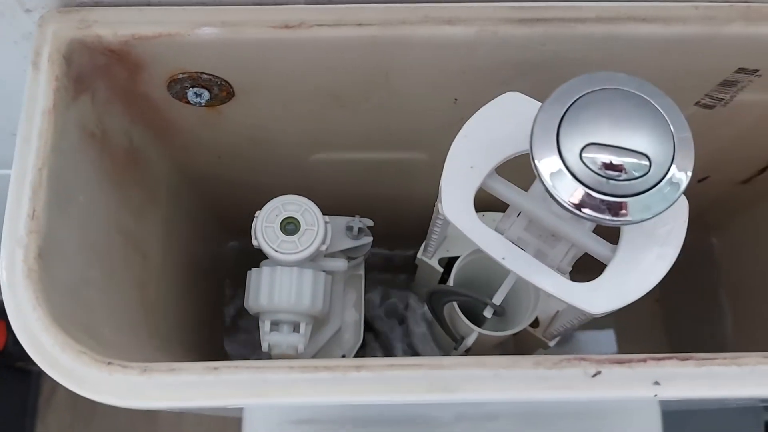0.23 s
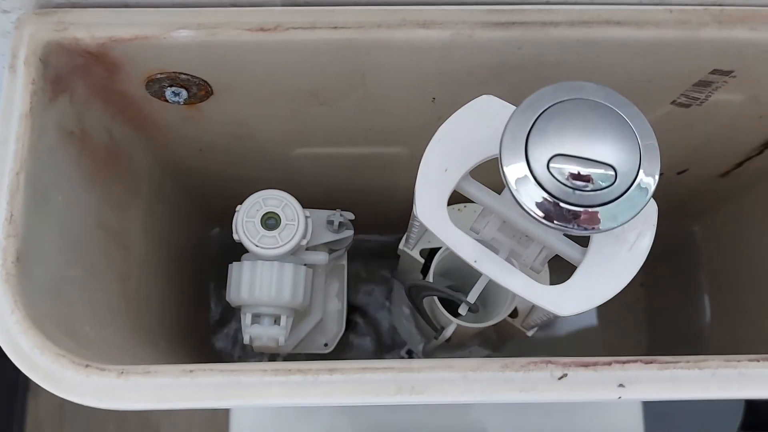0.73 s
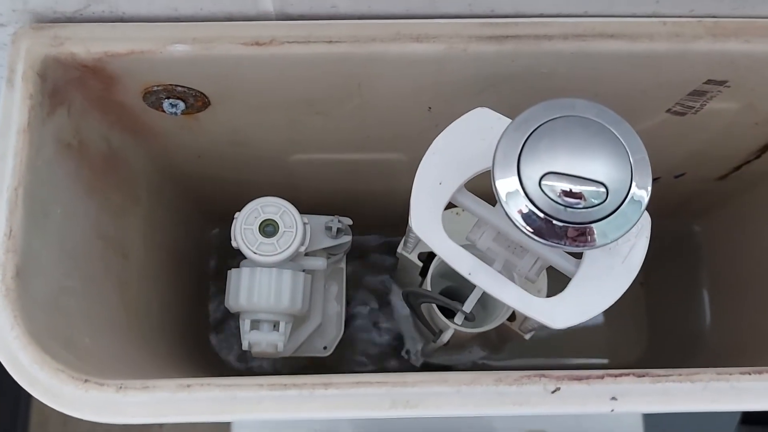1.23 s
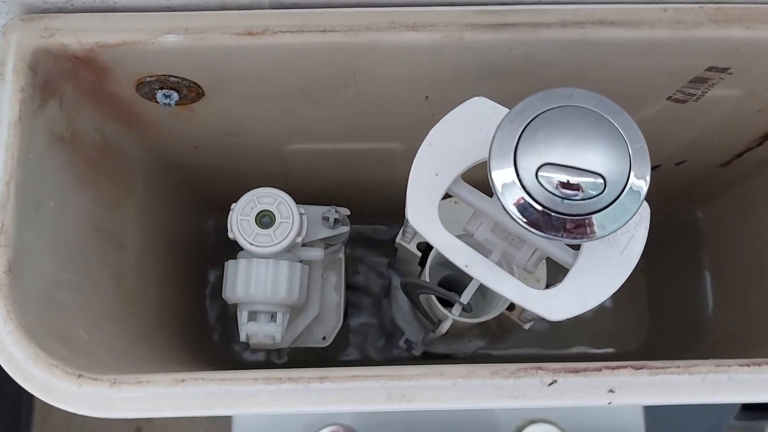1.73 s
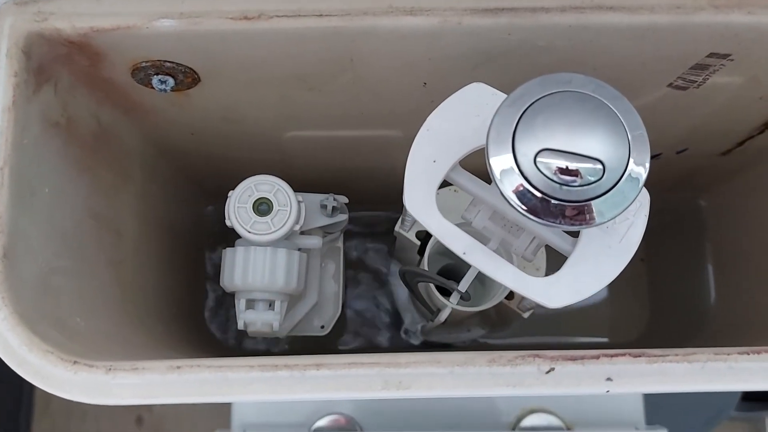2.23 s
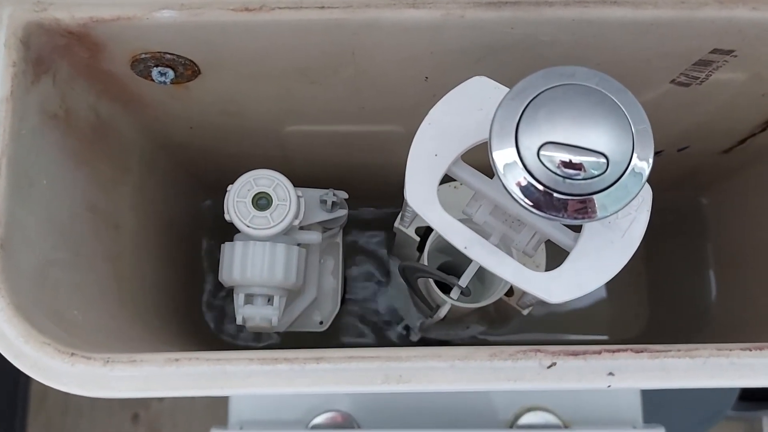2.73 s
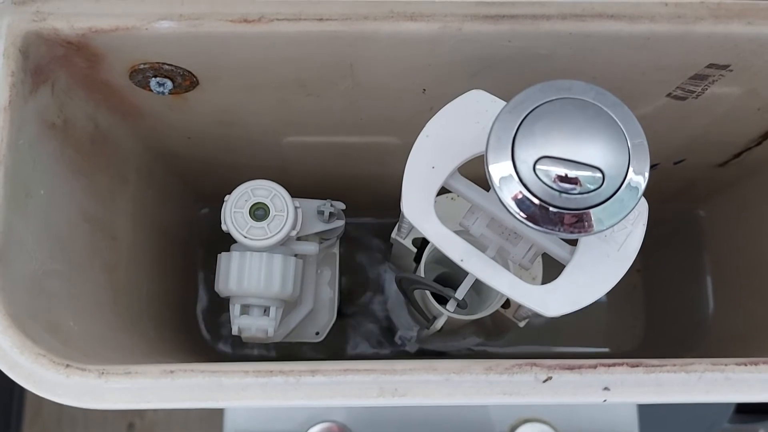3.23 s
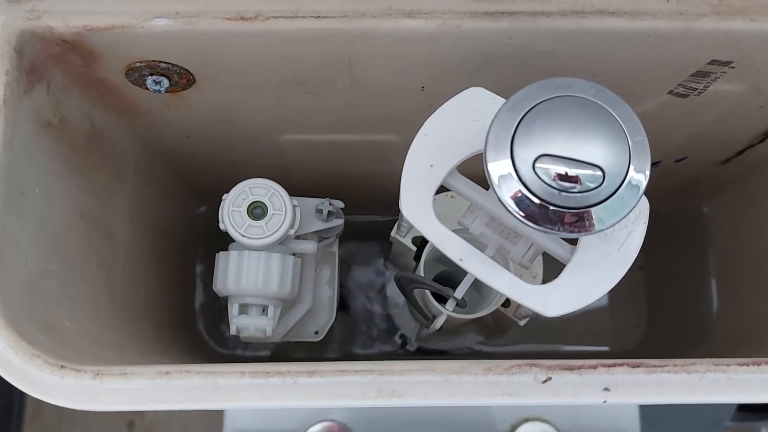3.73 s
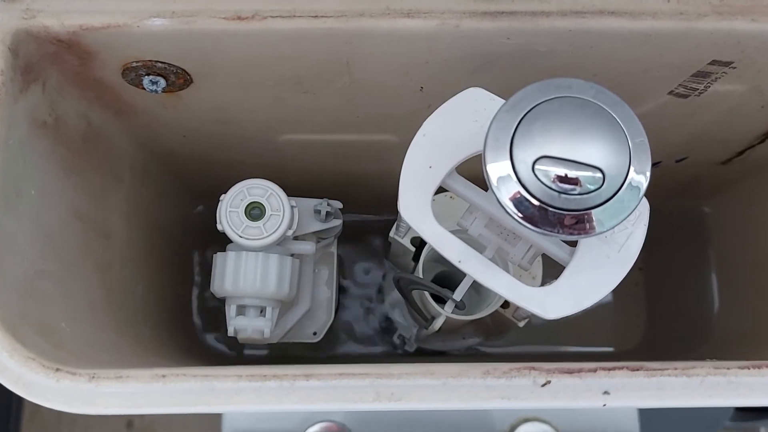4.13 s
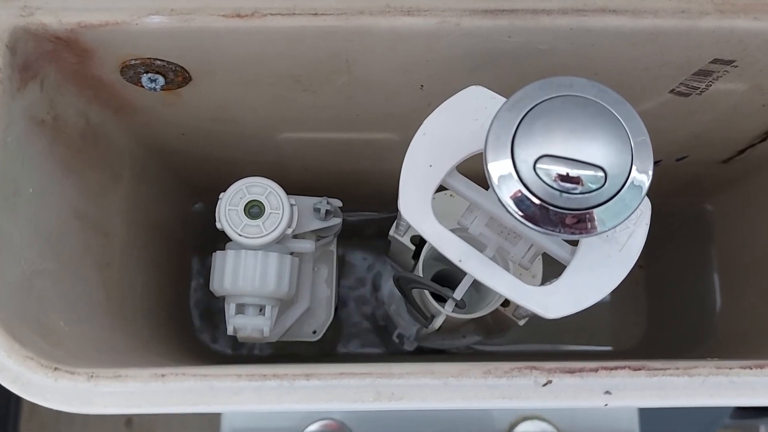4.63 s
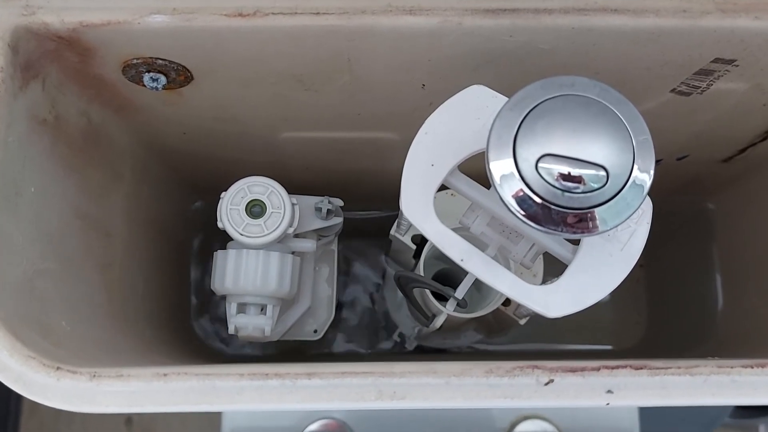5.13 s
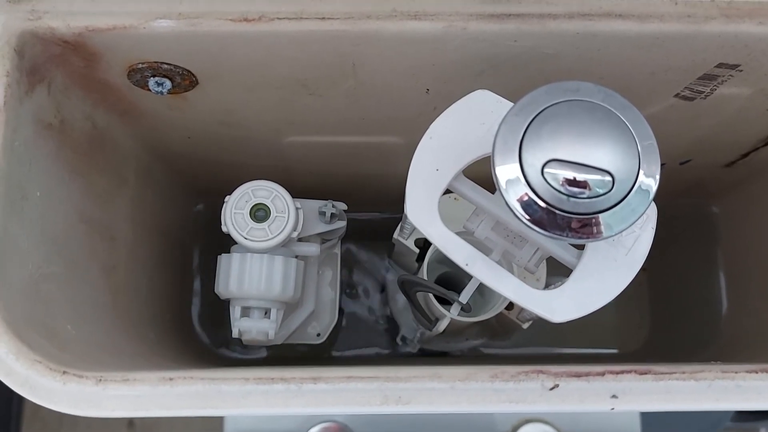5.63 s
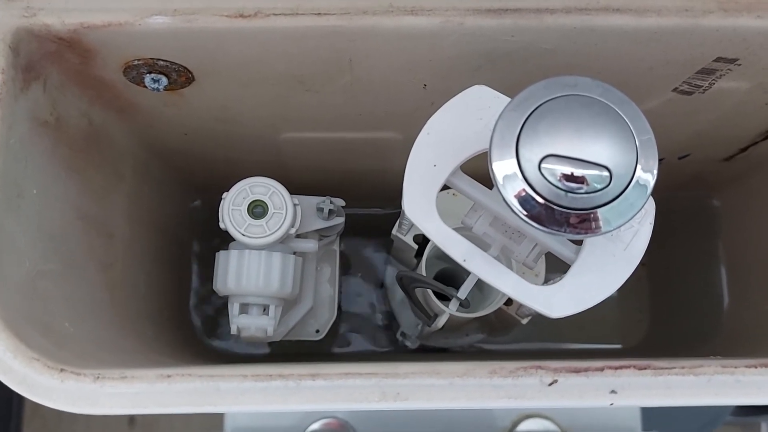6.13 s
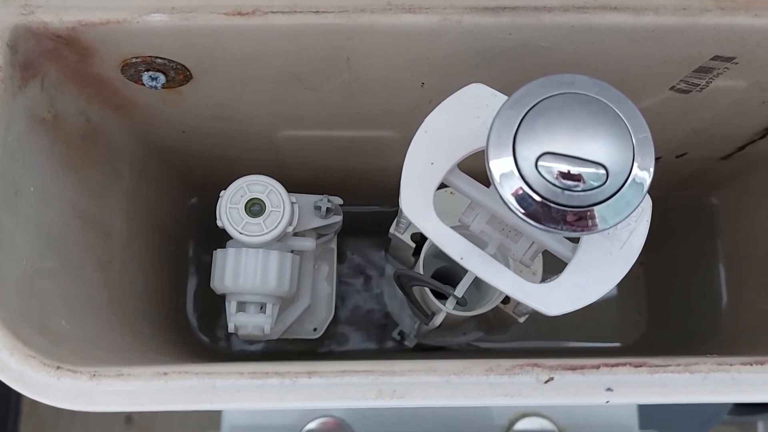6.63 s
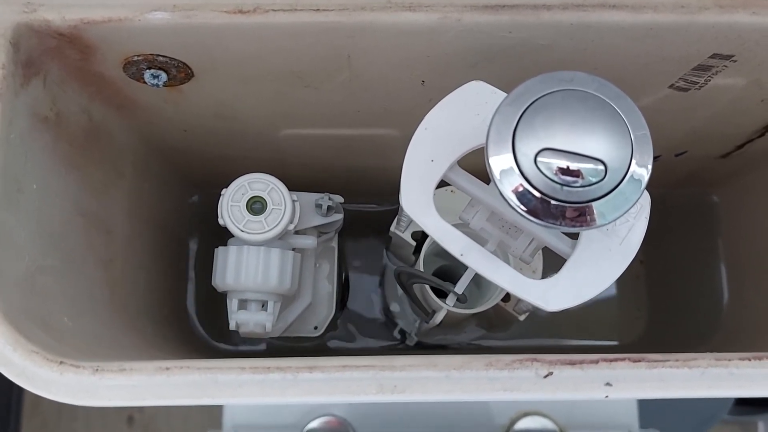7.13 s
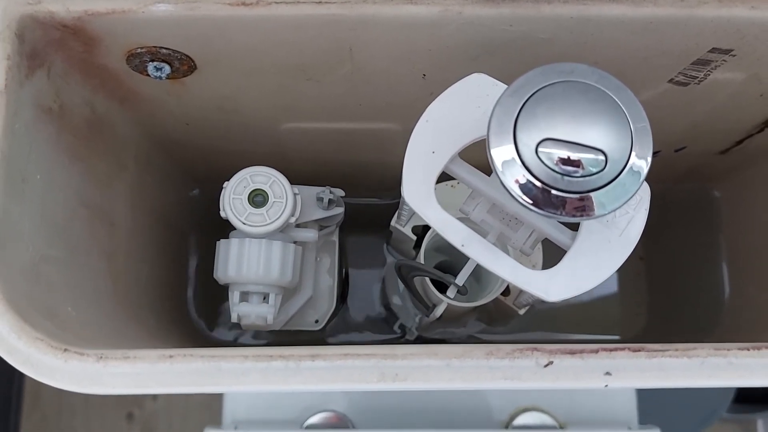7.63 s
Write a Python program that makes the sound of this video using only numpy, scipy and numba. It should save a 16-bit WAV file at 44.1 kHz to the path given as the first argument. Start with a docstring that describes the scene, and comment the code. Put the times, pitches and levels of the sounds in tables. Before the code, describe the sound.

Close above an open toilet tank, incoming water makes a bright, continuous hiss with a low churning rumble and a faint hollow ring. A steady low hum runs underneath in the bathroom. Small drips, fizzing and brief glugs are scattered through the flow. Toward the end a hollow tone falls in pitch into a few low glugs, and the filling carries on.

```python
"""A tiled bathroom, just above the rim of a toilet cistern refilling with its lid off.
Over a 100 Hz hum like a water pump's, the inlet jet hisses, churns and spatters, and the tank's
resonances come and go as the water rises. Fine bubbles fizz, droplets plink, large bubbles glug.
Near the end the water closes an air gap under the fittings, whose hollow note slides down."""
import sys
import numpy as np
from scipy import signal
from scipy.fft import rfft, irfft, next_fast_len
from scipy.io import wavfile
from scipy.ndimage import uniform_filter1d
from numba import njit

SR = 44100
rng = np.random.default_rng(int(sys.argv[2]) if len(sys.argv) > 2 else 0)


def to_wav(s):
    """Save 16-bit WAV."""
    ch = np.atleast_2d(s).T  # columns
    pcm = np.round(np.clip(ch, -1, 1) * 32767)  # PCM
    wavfile.write(sys.argv[1], SR, pcm.astype(np.int16))


N = 348390
TIME = np.arange(N) / SR
FFT_SIZE = next_fast_len(N)
FREQS = np.arange(FFT_SIZE // 2 + 1) * SR / FFT_SIZE + 1e-6
BUILD_FROM_S, FULL_FLOW_S = 0.59, 1.32  # the inflow builds up, then holds


def undb(db):
    """Decibels to gain."""
    return 10 ** (np.asarray(db) / 20)


def eq_curve(points):
    """Gain at every frequency from (Hz, dB) points."""
    hz, db = np.transpose(points)
    return undb(np.interp(np.log(FREQS), np.log(hz), db))


def apply_eq(x, response):
    """Filter a sound by a frequency response."""
    return irfft(rfft(x, FFT_SIZE) * response, FFT_SIZE)[..., :N]


def unit_rms(x):
    """Scale to rms 1."""
    return x / np.sqrt(np.mean(x ** 2))


def wander(rate_hz):
    """Smooth random modulation of rms 1 that moves about rate_hz times a second."""
    return unit_rms(apply_eq(rng.standard_normal(N), np.exp(-(FREQS / rate_hz) ** 2)))


def ramp(start_s, length_s):
    """A straight rise from 0 to 1 that then holds."""
    return np.clip((TIME - start_s) / length_s, 0, 1)


def inflow_db(rise_db):
    """A fader that climbs by rise_db to 0 dB as the flow builds up."""
    return rise_db * (ramp(BUILD_FROM_S, FULL_FLOW_S - BUILD_FROM_S) - 1)


@njit
def bandpass(x, hz, width_hz):
    """State-variable band-pass whose centre and width may move."""
    y, band_state, low_state = np.empty(len(x)), 0., 0.
    for i in range(len(x)):
        tuning, damping = np.tan(np.pi * hz[i] / SR), width_hz[i] / hz[i]
        band = (band_state + tuning * (x[i] - low_state)) / (1 + tuning * (tuning + damping))
        band_state = 2 * band - band_state
        low_state += 2 * tuning * band
        y[i] = damping * band
    return y


def noise_band(hz, width_hz):
    """Noise band-passed twice around a pitch curve."""
    noise = rng.standard_normal(len(hz))
    return bandpass(bandpass(noise, hz, width_hz), hz, width_hz)


def burst(hz, spread, fade_s):
    """A short splash of noise around one pitch, different at each ear."""
    t = TIME[:SR // 20]
    centre_hz = np.full(len(t), float(hz))
    width_hz = spread * centre_hz * np.sinc(2 * hz / SR)
    ears = [unit_rms(noise_band(centre_hz, width_hz)) for _ in range(2)]
    return np.array(ears) * np.exp(-t / fade_s)


def walls(x, t60_s, wet_db):
    """Dense echoes from hard glazed walls, different at each ear."""
    t = TIME[:SR // 2]
    tail = rng.standard_normal((2, len(t))) * np.exp(-np.log(1000) * t / t60_s)
    tail *= undb(wet_db) / np.sqrt(np.sum(tail ** 2, axis=1, keepdims=True))
    echoes = signal.fftconvolve(x, tail, axes=1)[:, :N]
    return (x + echoes) / np.sqrt(1 + undb(wet_db) ** 2)


def add(out, start_s, sound):
    """Mix a short sound in at start_s."""
    start = max(int(start_s * SR), 0)
    out[:, start:start + sound.shape[-1]] += sound[..., :N - start]


# The hum's harmonic stack: harmonic_number, level_db, left_minus_right_db
HUM_PARTIALS = [(1, 0, -0.24), (2, -22, 3.5), (3, -36.5, -4.5), (4, -37.5, -4), (5, -32.5, -16),
                (6, -64, 2), (8, -38, -4)]


def hum(pitch_hz=100.05, level_db=-25, throb_hz=3.5, throb_db=0.53):
    """A near-pure mains hum that throbs unevenly and whose weak overtones waver."""
    phase = 2 * np.pi * pitch_hz * TIME + 0.08 * wander(2)
    out = np.zeros((2, N))
    for harmonic, db, pan_db in HUM_PARTIALS:
        waver_db = 3 * wander(3.9) * (harmonic > 1)
        tone = np.sqrt(2) * np.sin(harmonic * phase + 2 * np.pi * rng.random())
        out += undb([[db + pan_db / 2], [db - pan_db / 2]]) * tone * undb(waver_db)
    throb = unit_rms(np.sin(2 * np.pi * throb_hz * TIME + 2 * wander(1))) * ramp(0, FULL_FLOW_S)
    return out * undb(level_db + inflow_db(4.5) + throb_db * throb)


# Stereo width of the rushing water: frequency_hz, side_minus_mid_db
STEREO_WIDTH = [(60, 1), (150, -22), (330, -21), (600, 0), (1200, -0.5), (2200, 0), (4000, -0.5),
                (12000, 2)]
# Its pan across the spectrum: frequency_hz, left_minus_right_db
STEREO_PAN = [(150, -5), (350, 8), (520, -0.5), (900, 2), (2000, 2), (3600, 3.5), (4200, -2.5), (4800, 7.5),
              (7000, -3), (12000, 5.5)]


def turbulence():
    """Stereo noise of 0 dB per Hz: narrow in the low mids, scattered by the tank walls in the treble."""
    mid, side = rfft(rng.standard_normal((2, FFT_SIZE))) * np.sqrt(SR / 2)
    width, pan = eq_curve(STEREO_WIDTH), eq_curve(STEREO_PAN)
    ears = np.array([(mid + width * side) * pan, mid - width * side])
    power = (1 + width ** 2) * (1 + pan ** 2) / 2
    return irfft(ears / np.sqrt(power), FFT_SIZE)[:, :N]


# EQ of the valve's bright hiss: frequency_hz, level_db
HISS_EQ = [(900, -86.5), (1500, -84), (2200, -88), (2750, -85), (3300, -76.5), (4000, -74.5), (4550, -79.5),
           (5500, -84), (7000, -88), (8300, -91), (9400, -96.5), (11800, -91.5), (13300, -96.5),
           (15800, -102)]


def jet(level_db=0.5):
    """The inlet valve hisses; reflections between the walls cut a fine comb into the noise."""
    hiss = apply_eq(turbulence(), eq_curve(HISS_EQ)) * undb(1.06 * wander(40))
    return walls(hiss, t60_s=.11, wet_db=-6) * undb(level_db + inflow_db(3.5))


# Tank resonances, each strongest as the water passes one height:
# pitch_hz, width_hz, level_db, peak_s, half_length_s, phase_between_ears_rad
TANK_RESONANCES = [(320, 77, -64, 6.92, 0.91, 0.5), (364.4, 78, -65.5, 2.9, 2.8, 0.5),
                   (920, 74, -78, 7, 2.7, 1.6), (1386, 106, -72.5, 6.4, 3.3, 2.5),
                   (1521, 74, -68.5, 5.23, 0.68, 1.8), (1563, 226, -71.5, 2, 1.8, 1.9),
                   (1810, 83, -69.5, 2.4, 2.46, 1.5), (1960, 95, -68, 4, 2.6, 1),
                   (2100, 99, -74, 2.1, 8.1, -1.5), (2343, 100, -77, 0.67, 4.3, 0),
                   (2514, 85, -69.5, 11, 6.7, 2), (2916, 166, -73.5, 2.5, 10, 2),
                   (3174, 103, -74, 1.3, 1.45, -0.5), (3484, 164, -70, 4.4, 3.6, 4),
                   (3720, 128, -64.5, 4.3, 1.77, 1.95), (3900, 180, -72, 3, 3.4, 2.5),
                   (4060, 123, -65.5, 7.5, 0.28, -1.5), (4100, 81, -73, 5.1, 2.8, -0.5),
                   (4343, 118, -67, 2.7, 2.3, -1.9), (4880, 620, -77, 5.7, 1.1, 4.5),
                   (5550, 900, -82.5, 3.8, 2.2, -2)]


def standing_waves(level_db=1.39):
    """The jet keeps the tank ringing; each resonance swells and fades as the water climbs."""
    out = np.zeros((2, N))
    drive = rfft(rng.standard_normal(FFT_SIZE)) * np.sqrt(SR / 2)
    for hz, width_hz, db, peak_s, half_length_s, phase_rad in TANK_RESONANCES:
        response = 1 / (1 + 1j * (FREQS ** 2 - hz ** 2) / (FREQS * width_hz)) ** 2
        ring = np.roll(drive, rng.integers(len(drive))) * response
        ears = irfft([ring * np.exp(1j * phase_rad), ring], FFT_SIZE)[:, :N]
        swell = 1 / np.sqrt(1 + ((TIME - peak_s) / half_length_s) ** 4)
        out += ears * swell * undb(db + 1.8 * wander(30))
    return out * undb(level_db + inflow_db(2.5))


# EQ of the underwater rumble: frequency_hz, level_db
CHURN_EQ = [(20, -85), (38, -72.5), (65, -63), (125, -69), (160, -66), (225, -70.5), (290, -68),
            (375, -68.5), (435, -73.5), (490, -71), (680, -76), (1000, -96.5), (2000, -105)]


def churn(level_db=0.4):
    """The jet stirs the water under the surface into a low, restless rumble."""
    rumble = apply_eq(turbulence(), eq_curve(CHURN_EQ))
    return rumble * undb(level_db + inflow_db(5) + 1.17 * wander(13))


# EQ of the midrange spatter: frequency_hz, level_db
SPATTER_EQ = [(400, -100), (750, -79), (1100, -82), (1700, -85.5), (2400, -81.5), (5000, -105)]
# Its fader ride: time_s, level_db
SPATTER_SURGES = [(0, -7), (1.3, 0.5), (3.2, 1), (4.0, -3.5), (5.6, 1.5), (6.7, .5), (7.4, -3), (7.9, 0)]


def spatter():
    """Water spatters on the surface, fluttering fast within slow surges."""
    spray = apply_eq(turbulence(), eq_curve(SPATTER_EQ))
    surge_db = np.interp(TIME, *np.transpose(SPATTER_SURGES))
    return spray * undb(surge_db + 2.7 * wander(60))


def fizz(bubbles_per_s=32, level_db=-64):
    """Tiny bubbles burst at random, each at its own pitch, a few louder than the rest."""
    out = np.zeros((2, N))
    for when, pitch, strength in rng.random((int(bubbles_per_s * N / SR), 3)):
        tick = burst(hz=5000 + 9000 * pitch, spread=.5, fade_s=.004)
        add(out, when * N / SR, undb(19 * strength ** 3) * tick)
    return out * undb(level_db + inflow_db(3.5))


# Cues for droplets and bursting bubbles: start_s, pitch_hz, level_db
POP_CUES = [(0.119, 8350, -42.5), (0.34, 10900, -43), (0.423, 8200, -39), (0.601, 10800, -42),
            (1.736, 11700, -39), (1.857, 7000, -36), (1.882, 12900, -33), (2.195, 6400, -35),
            (2.38, 4850, -28), (2.521, 6600, -33), (2.535, 11200, -36), (2.555, 8450, -32),
            (2.715, 6850, -33.5), (3.464, 11600, -38), (3.533, 13300, -38), (3.939, 6800, -37),
            (4.618, 7800, -37), (4.731, 6500, -33), (4.823, 11300, -37), (5.261, 11600, -37),
            (5.278, 4970, -34), (5.432, 8200, -33), (5.745, 5100, -35.5), (6.305, 11600, -35.5),
            (6.396, 9800, -33.5), (6.462, 6640, -37), (7.082, 11600, -30.5), (7.388, 7000, -39),
            (7.441, 5600, -38), (7.668, 11500, -37), (7.741, 6800, -36.5)]


def pops():
    """Each droplet gives a sharp wide crack and a short plink; the larger, lower ones ring longer."""
    out = np.zeros((2, N))
    for start_s, hz, db in POP_CUES:
        crack = burst(hz, spread=1.6, fade_s=.0008)
        plink = burst(hz, spread=.45, fade_s=22 / hz)
        add(out, start_s, undb(db) * (np.sqrt(2) * crack + plink))
    return out


# Cues for large ringing bubbles, and for droplets whose plinks ring near 4 kHz: start_s, level_db, pitch_hz
GLUG_CUES = [(.276, -35, 4050), (.318, -34, 1720), (.516, -29, 4300), (.82, -38, 1650), (.994, -33, 820),
             (1.055, -35, 1850), (1.325, -29, 700), (1.354, -27, 2000), (1.359, -33, 751),
             (1.442, -30, 4300), (1.442, -26, 1850), (1.505, -24, 1780), (1.757, -33, 1900),
             (2.005, -33, 1850), (2.267, -32, 850), (2.325, -32, 780), (2.424, -35, 850),
             (3.036, -32, 1960), (3.467, -31, 720), (4.034, -31, 4200), (4.521, -33, 3950),
             (5.674, -33, 2030), (6.614, -36, 1180), (6.884, -27, 510), (6.922, -29, 470),
             (6.964, -28, 340)]


def glugs(attack_s=.0015, fade_at_1khz_s=.009, pitch_rise_per_s=4, splash_db=-8):
    """Each large bubble or droplet splashes and rings briefly; a bubble's pitch rises as it nears the surface."""
    out, t = np.zeros((2, N)), TIME[:SR // 20]
    attack = 1 - np.exp(-t / attack_s)
    for start_s, db, hz in GLUG_CUES:
        fade_s = fade_at_1khz_s * np.sqrt(1000 / hz)  # larger, lower bubbles ring longer
        ring = np.exp(-t / fade_s) * np.sin(2 * np.pi * hz * (t + pitch_rise_per_s * t ** 2 / 2))
        splash = undb(splash_db) * burst(hz, spread=.5, fade_s=.008)
        add(out, start_s, undb(db) * attack * (ring + splash))
    return out


def air_gap(start_s=6.15, closed_s=6.98, open_hz=1460, closed_hz=311, closing_db=-35.5, murmur_db=-47):
    """A pocket of air rings lower and louder as the rising water narrows its opening, then murmurs on."""
    opening = 1 - ramp(start_s, closed_s - start_s)
    # as in a bottle, pitch squared follows the open area
    hz = np.sqrt(closed_hz ** 2 + (open_hz ** 2 - closed_hz ** 2) * opening)
    note = noise_band(hz, width_hz=.17 * hz)
    note /= np.sqrt(uniform_filter1d(note ** 2, size=1500) + 1e-12)  # the stream drives it evenly
    lapping = undb(3 * wander(30))
    slide_db = closing_db - 10 * np.log2(hz / closed_hz)
    closed = ramp(closed_s, length_s=.03)
    level_db = (1 - closed) * slide_db + closed * murmur_db
    return note * lapping * undb(level_db) * ramp(start_s, length_s=.21)


def scene():
    """Water and bubbles inside the tank, the hum in the tiled room around it."""
    bubbles = walls(glugs(), t60_s=.07, wet_db=-5)
    ticks = walls(pops() + fizz(), t60_s=.15, wet_db=-3)
    bed = hum() + jet() + standing_waves() + churn() + spatter()
    return bed + ticks + bubbles + air_gap()


def record(dry):
    """A steep high cut at 15.75 kHz on the whole mix."""
    return signal.sosfilt(signal.ellip(12, .1, 80, 15750, fs=SR, output="sos"), dry)


dry = scene()
out = record(dry)
to_wav(out)
```